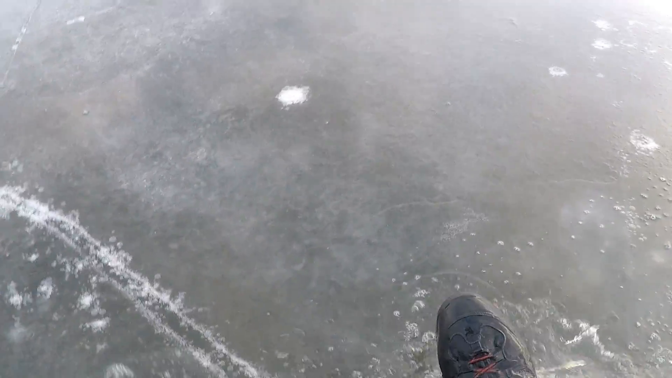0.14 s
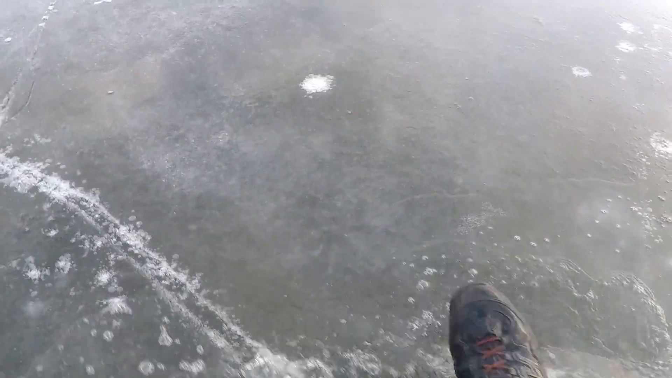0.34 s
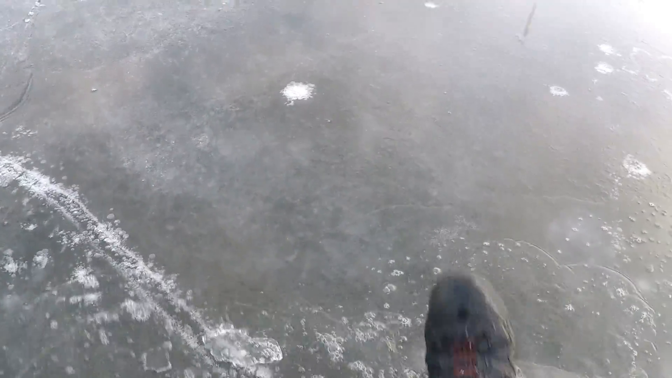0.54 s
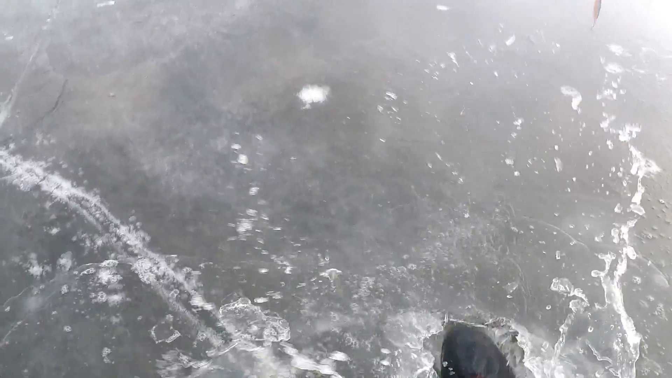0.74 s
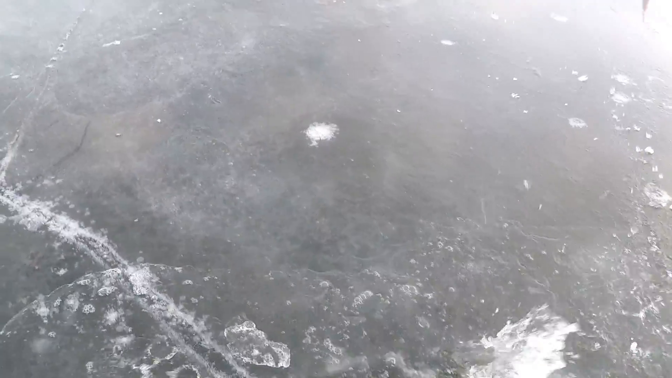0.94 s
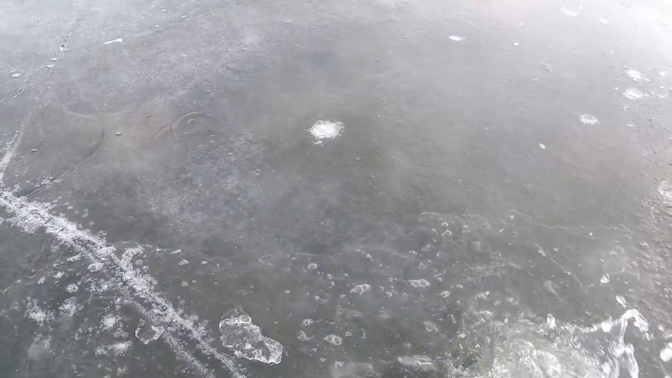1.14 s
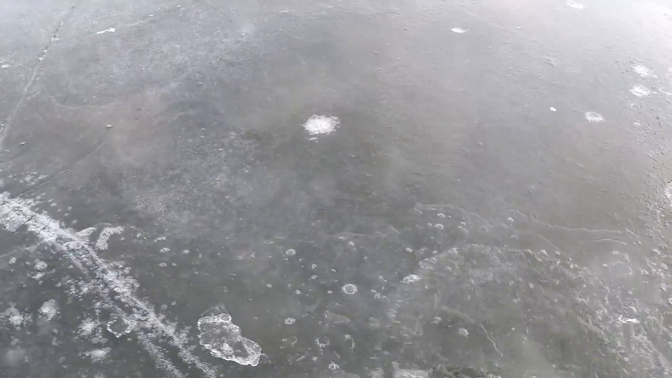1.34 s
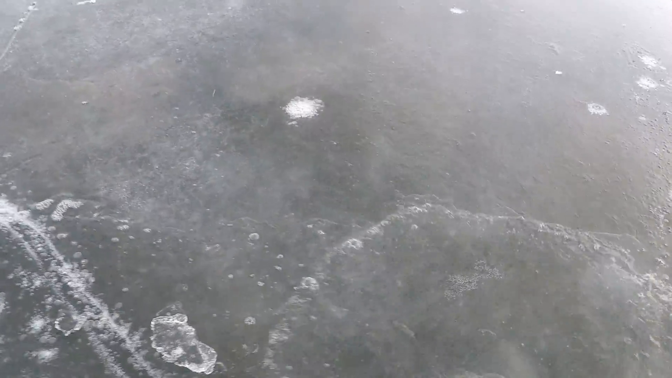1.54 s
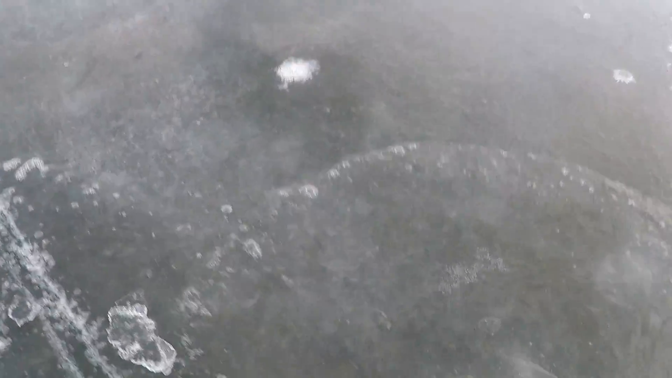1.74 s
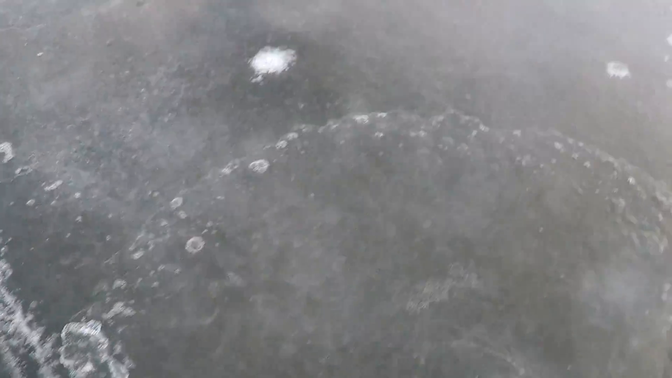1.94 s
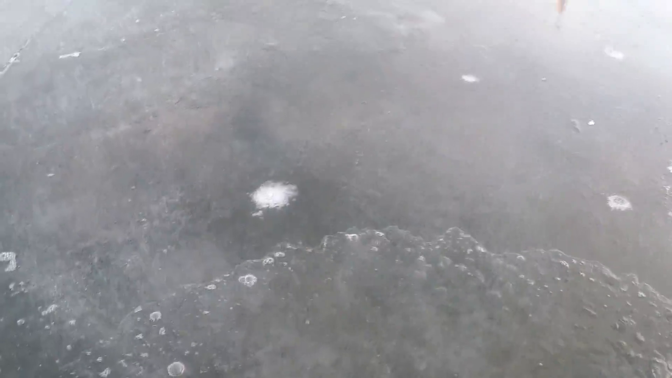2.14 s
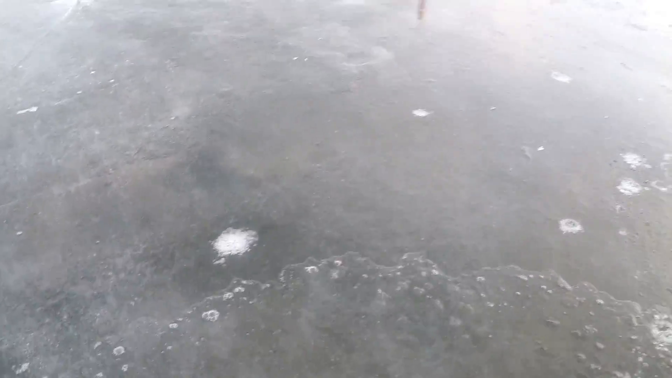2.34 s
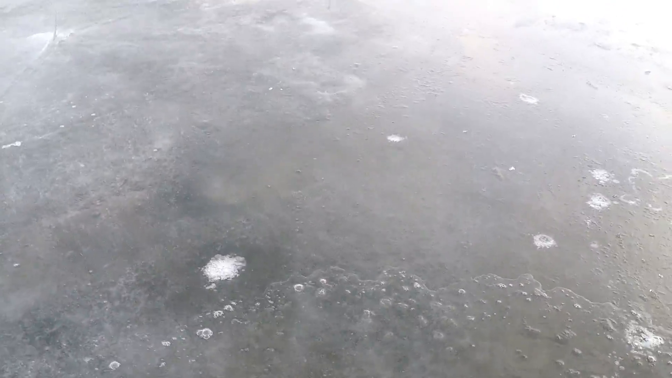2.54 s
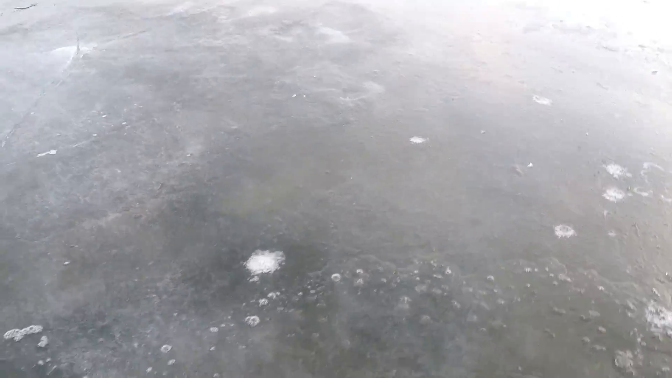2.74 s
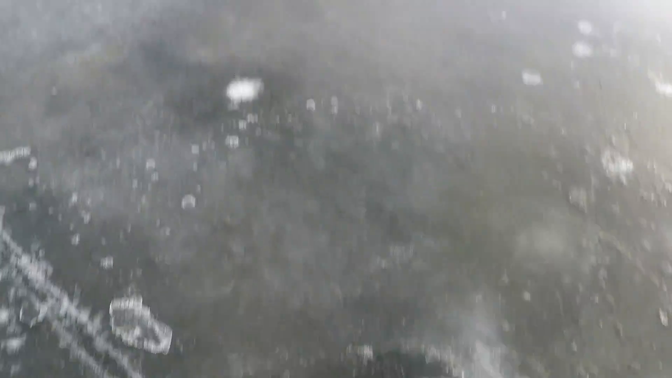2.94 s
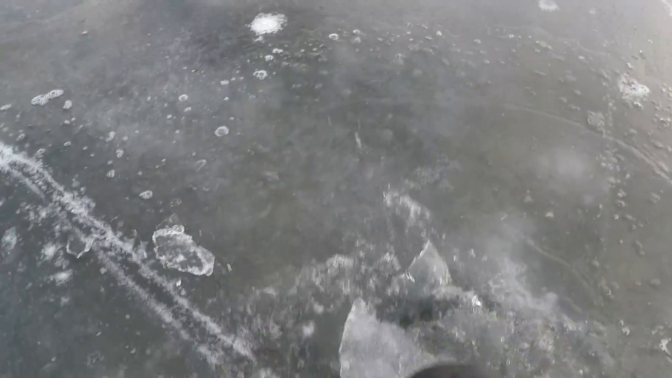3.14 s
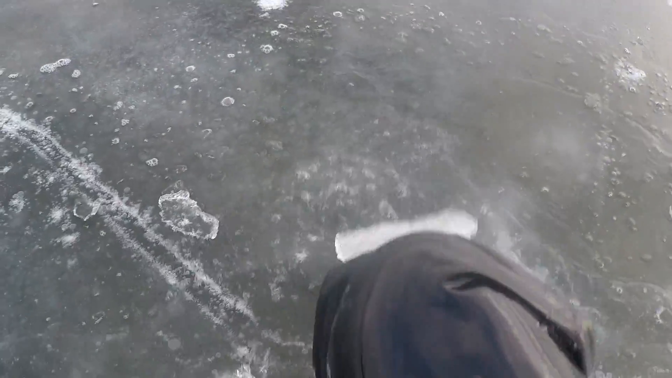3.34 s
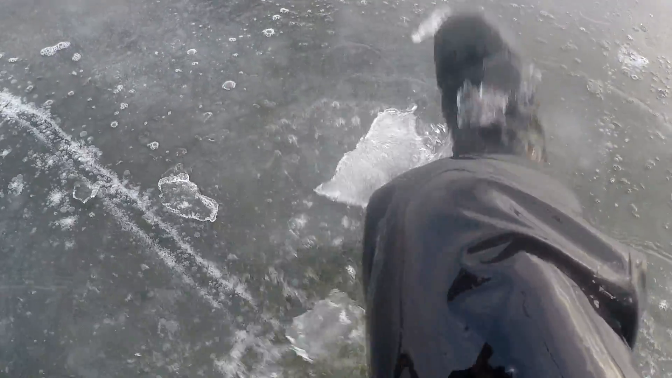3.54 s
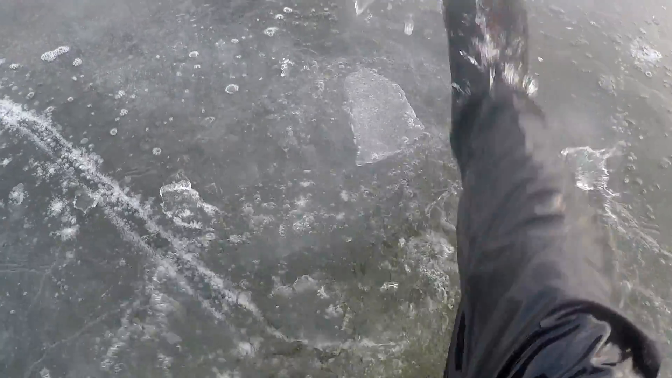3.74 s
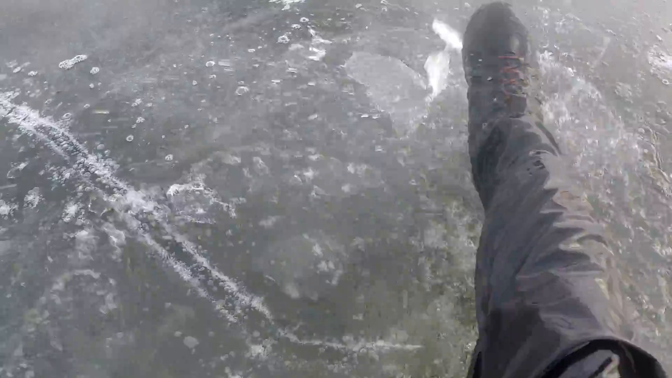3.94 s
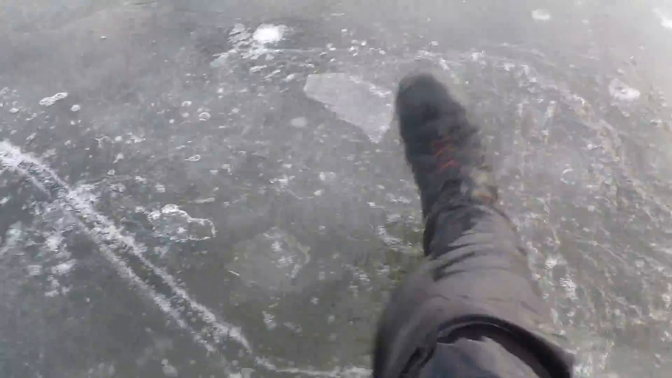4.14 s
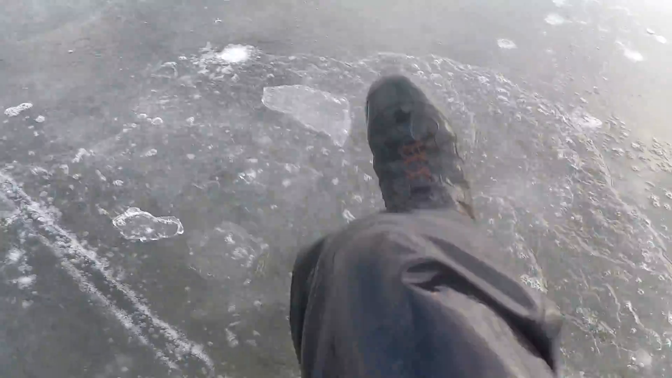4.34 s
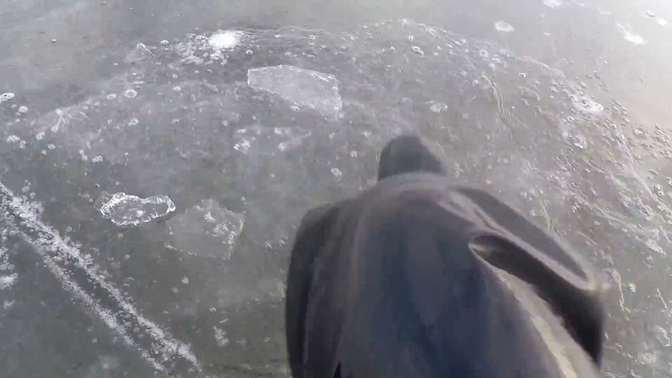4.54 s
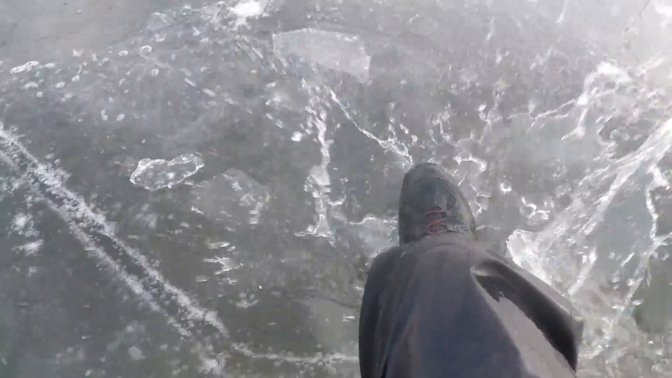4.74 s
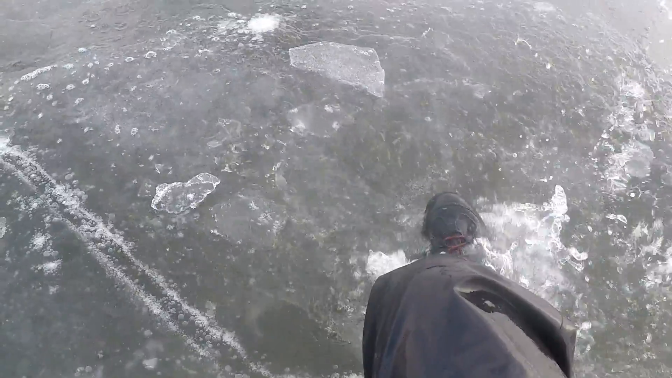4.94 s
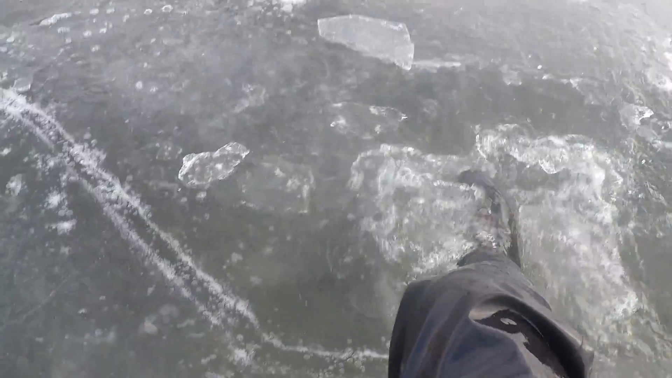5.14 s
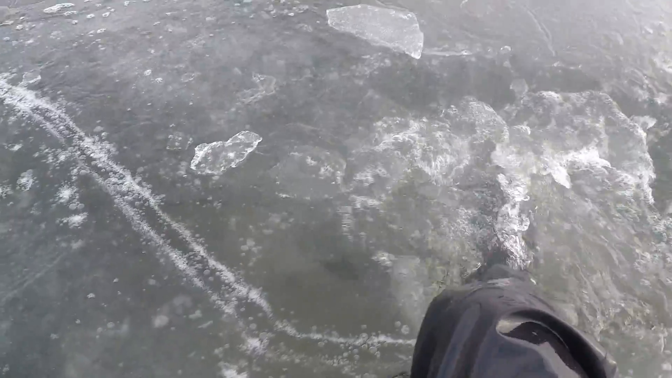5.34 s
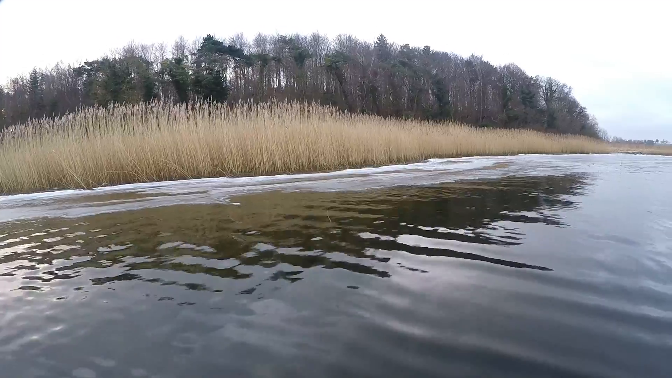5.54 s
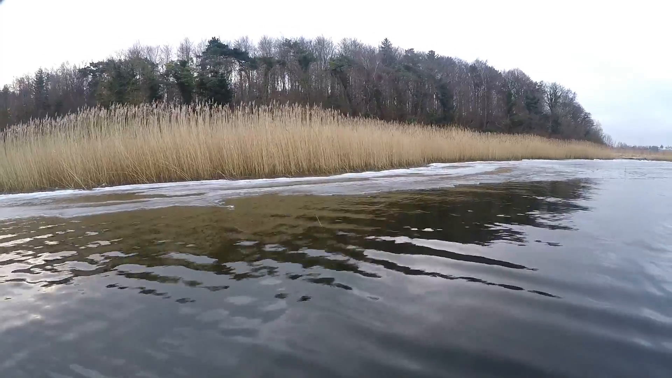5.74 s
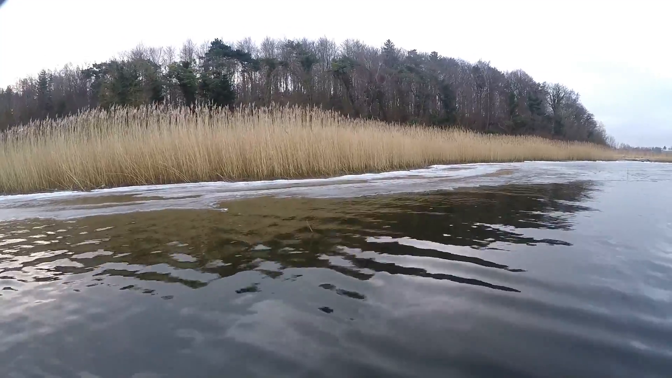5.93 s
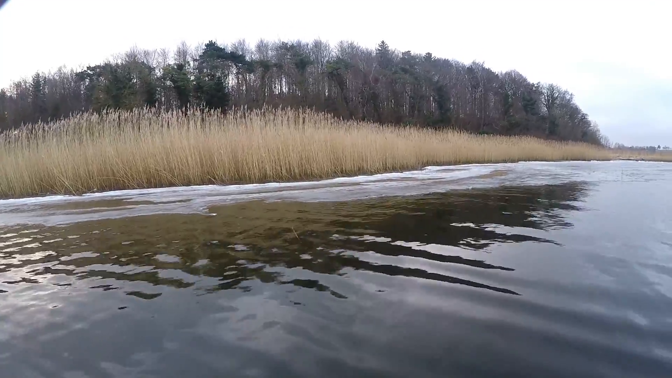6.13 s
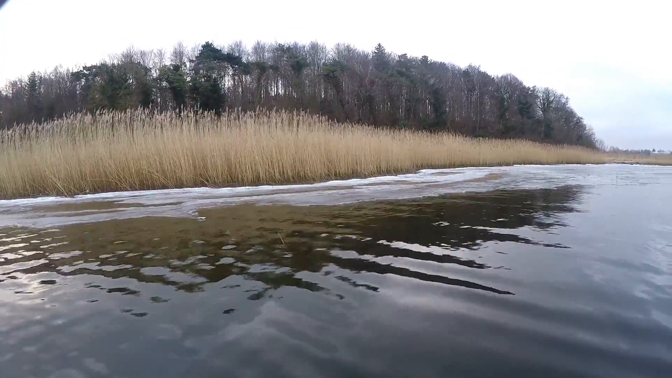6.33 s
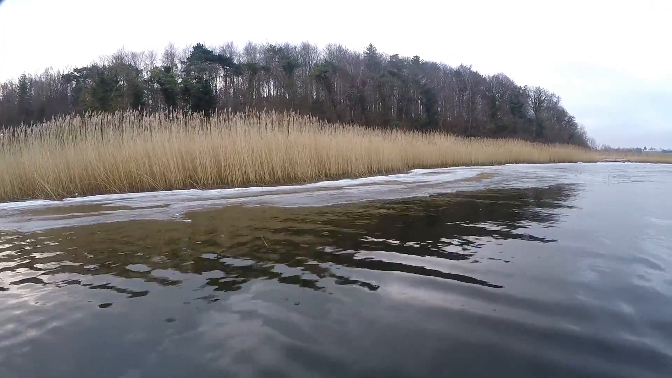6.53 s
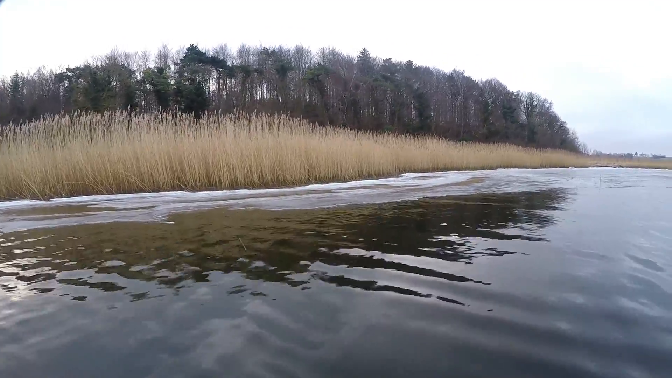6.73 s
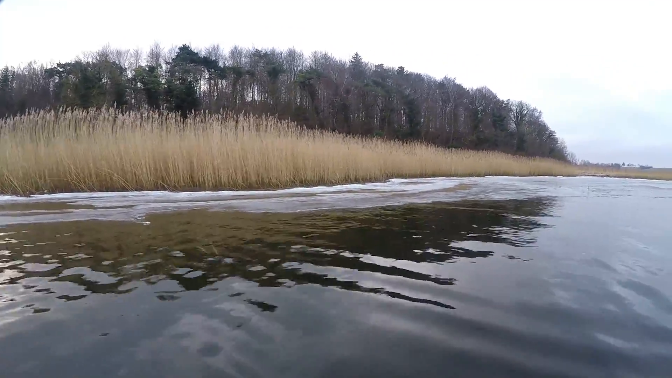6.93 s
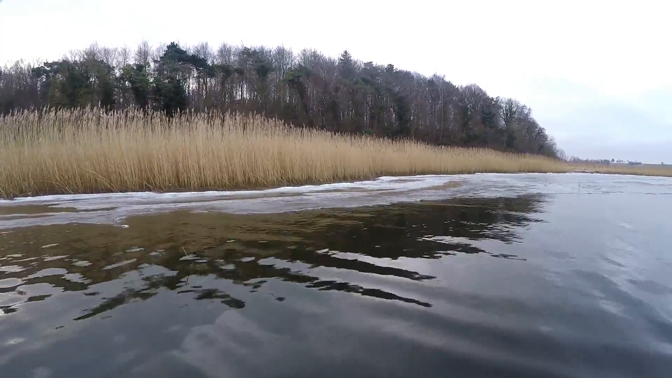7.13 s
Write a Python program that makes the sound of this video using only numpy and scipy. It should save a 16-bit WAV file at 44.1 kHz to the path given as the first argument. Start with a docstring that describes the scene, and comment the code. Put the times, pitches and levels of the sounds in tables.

```python
"""An icy shore, then open water: boots break thin ice and wade, heard at two body-worn microphone ports.
Snaps are short damped rings with crumbling noise; slush is clouds of tiny rings over filtered noise.
The sheet judders and squeaks against a pushing boot, slabs scrape, bubbles ring and wind rumbles in noise.
After a cut, in mono: a wash and trickle of small waves lap under thuds, gulps and low buffets of wind."""
import sys
import numpy as np
from scipy import signal
from scipy.fft import rfft, irfft, next_fast_len
from scipy.io import wavfile
from scipy.ndimage import uniform_filter1d

SR = 44100
rng = np.random.default_rng(int(sys.argv[2]) if len(sys.argv) > 2 else 0)


def output_pcm(signal):
    """Save a mono or channel-first signal as 16-bit PCM at the path in sys.argv[1].

    Samples are clipped to [-1, 1] before scaling.
    """
    pcm = np.clip(np.atleast_2d(signal).T, -1, 1) * 32767
    wavfile.write(sys.argv[1], SR, np.round(pcm).astype(np.int16))


N = 316638
PADDED = next_fast_len(N, True)
T = np.arange(N) / SR  # s
HZ = np.fft.rfftfreq(PADDED, 1 / SR)

CUT_S, EDGE_HZ = 5.546, 14900  # shore gives way to open water; upper band limit
STUCK_START_S, STUCK_END_S = 3.345, 3.66  # the boot presses against the sheet
CALM_DB, CALM_GRIT = (-53.5, -60.5, -54), 0.46  # between strokes: slosh, crunch, spray; share of crumbs
SWELL_S, SWELL_WIDTH_S, SWELL_DB = 6.36, 0.44, 8.5  # one slow swell: crest, half width, height
FADE_IN_S = 0.51  # open-water lapping after the cut

# Spectrum of slush. Each row: frequency in Hz, relative density in dB per Hz.
SLUSH_SPECTRUM = [(150, -4), (250, -1), (384, -5), (531, -5.5), (904, -7.5), (1320, -2.5), (1650, 0.5),
                  (2200, -5.5), (3210, -8.5), (4760, -16.5), (6050, -11), (7300, -16.5), (8240, -20),
                  (12600, -37), (15000, -37)]
# Spectrum of small waves. Each row: frequency in Hz, relative density in dB per Hz.
RIPPLE_SPECTRUM = [(240, -2), (310, 0), (487, -1), (816, -12), (1500, -9.5), (2150, -14), (2800, -24),
                   (3890, -24.5), (5350, -16), (7350, -20), (9090, -13.5), (15000, -31)]
# Spectrum of wind rumble. Each row: frequency in Hz, relative density in dB per Hz.
RUMBLE_SPECTRUM = [(8, -2), (25, 1), (55, -6.5), (110, -15), (200, -25.5), (500, -57), (4000, -115)]
# Spectrum of dull churning. Each row: frequency in Hz, relative density in dB per Hz.
DULL_SPECTRUM = [(50, -35.5), (95, -37), (145, 0.5), (240, -3), (350, -15), (600, -25.5), (1500, -57),
                 (8000, -86)]
# Level tilt of the ports. Each row: frequency in Hz, left over right in dB.
PORT_TILT = [(60, -2.5), (200, -3.5), (450, 0.5), (850, 1), (1150, -7.5), (1850, -2), (2600, -5.5),
             (4100, 0), (6600, 7), (9000, 0.5)]
# Phase between the ports. Each row: frequency in Hz, lead of the left in radians.
PORT_LEAD = [(30, 0), (200, -.25), (600, -.6), (950, -1.2), (1550, .3), (2300, -1), (4200, -.5),
             (6300, -1.4), (8000, -3), (11000, -6.3)]
# Likeness of noise at the ports. Each row: frequency in Hz, correlation from -1 to 1.
PORT_LIKENESS = [(60, 0.94), (170, 0.71), (350, 0.35), (520, 0.09), (1200, 0.11), (1700, 0.56),
                 (4200, 0.28), (6000, 0.33), (14000, 0.04)]
# Pushes of a boot or leg. Each row: peak in seconds, crunch level in dB, rise in seconds, t60 in seconds,
# slosh over crunch in dB, spray over crunch in dB, share of crumbs 0-1, left over right in dB.
STROKES = [(.07, -34.5, 0.2, 1.17, -5.5, 1, 0.53, 0.5), (.54, -49, 0.44, 0.37, 1, 11, 0.2, 0),
           (0.663, -28.5, 0.048, 1.06, 0.5, -4.5, 0.22, 0.5), (.76, -38.5, 0.091, 1.1, -4, 10.5, 0.56, 0),
           (.835, -31, 0.049, 0.46, -9, -7, 0.26, -3), (.985, -33.5, 0.54, 0.8, -4.5, 0.5, 0.21, 0),
           (1.32, -39.5, 0.37, 0.9, -9.5, 3.5, 0.54, 0.5), (1.599, -40, 0.54, 0.5, -5, -1, 0.72, -1),
           (1.76, -48, 0.72, 3.6, -2, 2, 0.55, -0.5), (2.68, -52, 0.081, 1.7, 5, 9, 0.38, -1.5),
           (3.04, -36, 0.32, 0.28, -6.5, -5, 0.5, 0), (3.1, -32.5, 0.22, 0.55, -9, -4, 0.22, 3),
           (3.28, -38.5, 0.33, 3.7, 1.5, -2, 0.45, -0.5), (3.635, -33, 0.41, 0.26, 1.5, -8.5, 0.29, 2.5),
           (3.81, -41.5, 0.98, 0.55, -26, 6.5, 0.77, -0.5),
           (3.876, -21, 0.014, 0.098, -2.5, -17.5, 0.53, 1), (3.968, -29, 0.064, 0.8, -14, -4.5, 0.26, 0.5),
           (4.086, -37.5, 0.072, 0.2, -16, 6, 0.4, 4), (4.69, -28, 0.024, 0.83, 0.5, 0.5, 0.3, 0.5),
           (4.81, -27.5, 0.13, 0.67, -5, -10, 0.34, 1), (5.16, -39, 0.89, 2, -3.5, 5.5, 0.35, -0.5),
           (5.47, -43.5, 0.45, 0.57, -1.5, -3.5, 0.74, -2)]
# Ice snaps and ticks. Each row: start in seconds, relative level in dB, ring in Hz, left over right in dB,
# crumbling over the snap in dB before trims, t60 of the early crumbling in seconds.
CRACKS = [(0.056, -9, 3060, -1, -15, .024), (0.135, -2, 6160, 18, -37, 0.022),
          (0.158, -18.5, 1900, 0, -8, 0.031), (0.224, -7.5, 5740, 5, -15.5, 0.016),
          (0.664, -8, 1800, -1.5, 1, 0.0068), (0.708, -13.5, 1340, -3, -7, 0.067),
          (0.756, -9, 4200, 7, -23.5, 0.032), (0.826, -16.5, 1890, -0.5, -12.5, 0.041),
          (0.862, -17, 3160, -3, -10.5, 0.027), (0.93, -23, 1556, -1, 2, 0.013),
          (0.945, -5, 3000, -2, -14.5, 0.043), (0.988, -4.5, 5340, 8, -21, 0.014),
          (1.266, -6.5, 4200, -4.5, -11, 0.017), (1.333, -12, 3330, -9.5, -10.5, 0.029),
          (1.384, -17, 1620, -8, -13, 0.034), (1.429, -21, 1830, -7, -6, 0.022),
          (1.5, -20, 3250, 2, -18, 0.049), (1.72, -21.5, 3130, -6, -6, .015),
          (1.746, -10, 3250, 0, -11, 0.025), (1.755, -17, 1500, -17, -12.5, 0.017),
          (2.603, -30.5, 2060, -2, -1, 0.025), (2.933, -10, 3200, -4, -19, 0.02),
          (2.996, -12, 1740, 6, -28, .024), (3.025, -25, 4200, 11, -17, .04),
          (3.049, -10, 3130, 3, -11, 0.03), (3.085, -2.5, 5960, 13, -24, 0.031),
          (3.094, -20, 2970, -4, -5.5, 0.079), (3.35, -14, 1980, 23, -10.5, 0.026),
          (3.402, -12, 3670, 0, -19, 0.022), (3.5785, -17.5, 1370, 1.5, -11.5, 0.012),
          (3.643, -9, 1910, 12.5, -17, 0.012), (3.653, -2.5, 3120, -5, -16, .024),
          (3.655, -7, 1810, 12, -13, 0.014), (3.707, -12.5, 5670, 5.5, -14.5, 0.022),
          (3.862, -8, 3420, 4, -5.5, 0.019), (3.8695, -10, 3960, -1.5, -21.5, 0.013),
          (3.8759, 0, 1540, 4, -25, 0.04), (3.971, -2, 3980, 3, -17.5, 0.03),
          (4.011, -11, 1370, 6, -14, 0.02), (4.077, -1, 5940, 3.5, -24, .014),
          (4.091, -10, 4280, -4, -12.5, 0.02), (4.153, -20, 1533, 1, -21, .02),
          (4.25, -19.5, 1600, -6, -13.5, 0.027), (4.663, -13, 3340, -1.5, -9, 0.079),
          (4.675, -12.5, 1810, 15.5, -13, 0.016), (4.683, -6, 2450, -0.5, -15, 0.068),
          (4.699, -12.5, 1500, -10, -12, 0.073), (4.824, -7, 1285, -6, -26, 0.022),
          (4.899, -13.5, 1280, -3, -12, 0.061), (5.1991, -17.5, 1820, 0, -16, 0.029),
          (6.851, -38, 1300, -4, -4, 0.021), (6.872, -31.5, 1080, 2, -6, 0.016)]
# Pressure pulses as the sheet gives way. Each row: start in seconds, level in dB.
BREAKS = [(0.6642, -5), (3.8764, -5)]
# Stick-slip jerks of the boot on the sheet. Each row: start in seconds, relative level in dB.
JERKS = [(3.3507, -11), (3.369, -9), (3.4015, -13), (3.427, -13.5), (3.439, -15), (3.456, -11),
         (3.484, -11.5), (3.508, -10.5), (3.5332, -11), (3.5551, -14), (3.579, -12.5), (3.6094, -11),
         (3.6312, -12.5)]
# Single knocks of the boot on the sheet. Each row: start in seconds, relative level in dB.
KNOCKS = [(3.861, -21), (4.151, -11), (5.196, -18.5)]
# Squeaks of wet rubber on the sheet's edge. Each row: start in seconds, level in dB, first pitch in Hz,
# last pitch in Hz, length in seconds.
SQUEAKS = [(3.348, -29.5, 650, 2860, 0.028), (3.427, -36.5, 560, 1920, 0.04),
           (3.628, -25, 1225, 2150, 0.0246)]
# Scrapes of a loose slab. Each row: start in seconds, length in seconds, level in dB.
SCRAPES = [(1.283, 0.26, -50), (2.958, 0.21, -35), (3.174, 0.075, -39)]
# Air trapped by a plunging boot. Each row: start in seconds, length in seconds, level in dB,
# first resonance in Hz, last resonance in Hz.
POCKETS = [(0.736, 0.084, -30, 605, 524), (0.811, 0.04, -35, 529, 480), (1.485, 0.06, -37, 723, 632),
           (1.667, 0.04, -42.5, 600, 710), (1.884, 0.041, -37.5, 1348, 1840),
           (4.694, 0.0373, -28, 529, 505), (4.778, 0.08, -34.5, 1350, 1114)]
# Loudest single bubbles and drips. Each row: start in seconds, relative level in dB, pitch in Hz.
BUBBLES = [(0.838, -6, 5400), (1.212, -18, 4950), (1.304, -8, 4300), (1.549, -22, 1400),
           (1.602, -18.5, 1650), (1.73, -17, 660), (1.795, -16, 1570), (1.923, -21.5, 3200),
           (2.016, -24, 1590), (2.39, -24.5, 3580), (2.475, -17, 3740), (2.566, -17.5, 5500),
           (2.865, -15.5, 4960), (3.223, -14.5, 3120), (5.849, -29.5, 1684), (5.923, -30.5, 2000),
           (6.05, -24.5, 1290), (6.189, -28, 1760), (6.245, -25, 1440), (6.353, -26.5, 1490),
           (6.366, -28, 1750), (6.686, -31, 1420)]
# Air squeezed along under the sheet. Each row: start in seconds, level in dB, first pitch in Hz,
# last pitch in Hz, length in seconds.
GURGLES = [(0.667, -20, 515, 524, 0.02), (.700, -31, 1500, 4200, 0.008), (0.786, -28, 870, 1280, 0.009),
           (1.365, -26.5, 610, 756, 0.0047), (1.593, -35, 626, 805, 0.017), (2.608, -48, 1240, 1680, 0.031),
           (2.729, -34, 536, 493, 0.023), (2.909, -30, 2080, 2950, 0.012), (2.951, -32, 4300, 4900, 0.012),
           (3.768, -30, 1880, 2160, .015), (3.805, -32, 1450, 1750, .016), (4.85, -24, 1160, 1100, 0.015)]
# Large pockets of air closed over by water. Each row: start in seconds, level in dB, pitch in Hz.
GULPS = [(1.887, -29.5, 177), (3.17, -26, 181), (3.306, -22.5, 148), (4.778, -15.5, 170),
         (5.187, -16.5, 221), (6.326, -22.5, 169), (6.342, -27.5, 282), (6.983, -26.5, 187)]
# Footfalls, gulping water and wind. Each row: start in seconds, relative level in dB, pitch in Hz.
THUDS = [(0.664, -11.5, 533), (0.667, -20, 227), (0.976, -26, 168), (1.23, -28, 164), (2.216, -29, 221),
         (3.631, -13.5, 59.7), (3.75, -13.5, 59.5), (3.862, -15.5, 184), (4.006, -18, 135.5),
         (4.154, -14.5, 74.4), (4.385, -19.5, 161), (4.683, -19, 263), (4.797, -15.5, 294),
         (5.039, -15.5, 109), (5.201, -12.5, 62.4), (5.346, -24.5, 154), (5.791, -19, 77),
         (6.188, -13.5, 70), (6.438, -19, 113), (6.514, -13, 61.6), (7.067, -18, 62), (7.117, -14.5, 61.7)]
# Wavelets folding over. Each row: start in seconds, gain added to the steady trickle's gain of 1 in dB.
WAVELETS = [(5.995, 3), (6.051, 3), (6.453, 5), (6.645, 3), (7.15, 12)]
# Wind on the microphone. Each row: time in seconds, rumble level in dB.
WIND = [(0.0, -55), (0.46, -65), (0.94, -36.5), (1.62, -47), (3.18, -29.5), (3.64, -20), (3.68, -46),
        (3.76, -25), (4.32, -30), (4.38, -19), (4.46, -29.5), (5.18, -30.5), (5.2, -29), (5.42, -37.5),
        (6.5, -24.5), (6.8, -31.5), (7.1, -22.5), (7.18, -33)]


def amp(db):
    """Decibels to gain."""
    return np.exp(np.asarray(db) * (np.log(10) / 20))


def read(points):
    """Interpolates a spectrum table over log frequency."""
    hz, value = np.transpose(points)
    return np.interp(np.log(HZ + 1), np.log(hz + 1), value)


def shaped(x, gain):
    """Filters by a gain on the frequency grid."""
    return irfft(rfft(x, PADDED) * gain, PADDED)[..., :N]


def band(lo_hz, hi_hz, order=8):
    """Gain of a band-pass; neighbouring bands share their power."""
    return ((1 + (lo_hz / (HZ + 1)) ** order) * (1 + (HZ / hi_hz) ** order)) ** -.5


def band_passed(x, lo_hz, hi_hz, order=2):
    """Butterworth band-pass for short sounds."""
    return signal.lfilter(*signal.butter(order, [lo_hz, hi_hz], "band", fs=SR), x)


def evened(x):
    """Scales to rms 1 in the middle of the channels."""
    return x / np.sqrt(np.mean(np.atleast_2d(x).mean(0) ** 2) + 1e-20)


def wander(hz):
    """Random modulator of rms 1, up to the given rate."""
    return evened(shaped(rng.standard_normal(N), band(hz / 8, hz)))


def add(mix, start_s, sound):
    """Lays a sound into the mix."""
    part = mix[:, max(round(start_s * SR), 0):][:, :sound.shape[-1]]
    part += sound[..., :part.shape[1]]


def noise_pair():
    """White noise, partly alike at the two ports."""
    left, other = rfft(rng.standard_normal((2, PADDED)))
    same = np.clip(read(PORT_LIKENESS), -1, 1)
    right = same * left + np.sqrt(1 - same ** 2) * other
    return irfft([left, right], PADDED)[:, :N]


def ports(x):
    """Each band differs in level and phase between the ports."""
    half = amp(read(PORT_TILT) / 2) * np.exp(.5j * read(PORT_LEAD))
    return shaped(x, np.array([half, 1 / half]))


def ring(t, hz, cycles, rise, phase=0):
    """A damped ring that lasts some cycles and glides in pitch, as a surfacing bubble does."""
    age = t * hz / cycles
    turns = hz * t * (1 + rise * np.minimum(age, 5))
    return (1 - np.exp(-2 * t * hz)) * np.exp(-age) * np.sin(2 * np.pi * turns + phase)


def scatter(per_s, spread_db):
    """Random events, a few much larger than the rest: start in s, gain on each side, kind 0-1."""
    most = 1000
    for when, keep, kind, size, side in rng.random((most, 5)):
        if keep < per_s * N / SR / most:
            size_db = spread_db * min(-np.log(1 - size), 3)
            yield when * N / SR, amp(size_db) * np.sqrt([[side], [1 - side]]), kind


def pressing(ease_s):
    """1 while the boot presses the sheet; builds up beforehand and lets go within 9 ms."""
    onset = np.clip((T - STUCK_START_S) / ease_s + 1, 0, 1)
    return onset * np.clip((STUCK_END_S - T) / 0.0087, 0, 1)


def churning(rise_db=20):
    """Strokes swell and die away; gives slosh, crunch and spray gains per side, and the share of crumbs."""
    power = amp(CALM_DB)[:, None, None] ** 2 * np.ones((2, N))
    total = power[:, 0].sum(0)
    gritty = CALM_GRIT * total
    for peak_s, db, rise_s, t60_s, slosh_db, spray_db, grit, pan_db in STROKES:
        drop_db = np.maximum(rise_db * (peak_s - T) / rise_s, 60 * (T - peak_s) / t60_s)
        stroke = amp(db - np.minimum(drop_db, 100)) ** 2
        sizes = amp([slosh_db, 0, spray_db]) ** 2
        power += np.outer(sizes, amp([pan_db, -pan_db]))[..., None] * stroke
        total += sizes.sum() * stroke
        gritty += grit * sizes.sum() * stroke
    return np.sqrt(power), np.clip(gritty / total, 0, 1)


def surges(drag_s=0.015, held_db=-11, surge_s=.005):
    """While the boot sticks against the sheet, the water is held back and moves only with each jerk."""
    stuck = pressing(drag_s)
    starts = np.sort([start_s for start_s, db in JERKS])
    since_s = abs(T - starts[np.maximum(np.searchsorted(starts, T) - 1, 0)])
    pulse = since_s / surge_s * np.exp(-since_s / surge_s)
    return 1 - stuck + stuck * (amp(held_db) + pulse)


def grains(per_s, spread_db, cycles, rise, count=60):
    """A whitened cloud of tiny rings, each size with its own phase between sides; a few are much larger."""
    t, out = np.arange(2048) / SR, np.zeros((2, N))
    most = 800
    for hz in np.geomspace(280, 13000, count):
        detune, length, side = rng.uniform(-0.71, 1, 3)
        grain_cycles = cycles * np.sqrt(hz / 2000) * 2.26 ** length
        grain = ring(t, hz * (1 + 0.012 * detune), grain_cycles, rise, side * np.array([[.9], [-.9]]))
        grain *= np.sqrt(hz ** 0.34 / np.sum(grain[0] ** 2))
        when, keep = rng.random((2, most))
        size_db = spread_db * np.minimum(rng.exponential(1, most), 3)
        sizes = rng.choice([-1, 1], most) * amp(size_db)
        heard = keep < per_s / count * (hz / 2000) ** .3 * N / SR / most
        for start_s, size in zip((when[heard] * N / SR).tolist(), sizes[heard]):
            add(out, start_s, size * grain)
    return evened(out)


def patchy(x, patch_db, order=3):
    """Swarms of bubbles light up small patches of the spectrum for a few milliseconds each."""
    z = signal.stft(x, nperseg=256)[2]
    swarms = uniform_filter1d(rng.standard_normal(z.shape[-2:]), order, 0)
    swarms = uniform_filter1d(swarms, order, 1)
    return signal.istft(z * amp(patch_db * swarms / swarms.std()))[1][..., :N]


def slush(slosh, crunch, spray, grit, droplet_db=-1, flutter_db=1.0, clump_db=2.5, patch_db=2.5):
    """Crumbs and droplets ring over a noise wash; three bands clump separately and follow the strokes."""
    crumbs = grains(per_s=1800, spread_db=3.5, cycles=1.42, rise=0)
    droplets = grains(per_s=900, spread_db=3.0, cycles=12.6, rise=0.014)
    rings = evened(crumbs + amp(droplet_db) * droplets)
    cloud = np.sqrt(grit) * rings + np.sqrt(1 - grit) * evened(noise_pair())
    stirred = np.minimum(crunch / amp(-39.5), 1)  # calm water hisses evenly
    cloud = cloud + stirred * (patchy(cloud, patch_db) - cloud)
    fluttering = cloud * amp(grit * flutter_db * wander(hz=92.5))
    cloud = ports(shaped(fluttering, amp(read(SLUSH_SPECTRUM))))
    out = np.zeros((2, N))
    for level, gain in [(slosh, band(230, 883)), (crunch, band(1130, 4870)), (spray, band(3710, 12600))]:
        clumps = amp(grit * clump_db * wander(hz=56.3))
        out += level * evened(shaped(cloud, gain) * clumps)
    return out


def cracks(snap_db=-3.0, snap_cycles=3.6, tail_db=-19, tail_t60_s=0.21, strain_db=-11, strain_s=0.006,
           stutter_db=3):
    """The ice crackles under strain, snaps and rings for a few cycles; smaller breaks stutter on behind."""
    early_s = .02
    t = np.arange(SR // 5) / SR - early_s
    after = np.maximum(t, 0)
    snaps, crumbs = np.zeros((2, N)), np.zeros((2, N))
    for start_s, db, hz, pan_db, crumbling_db, t60_s in CRACKS:
        shared, left, right = rng.standard_normal((3, len(t)))
        noise = shared + 0.92 * np.array([left, right])
        breaks = band_passed(noise, hz * 0.31, min(hz * 2.45, SR / 2.2), order=1)
        strain = amp(strain_db) * np.exp(-abs(t) / strain_s)
        decay = amp(-60 * after / t60_s) + amp(tail_db - 60 * after / tail_t60_s)
        fade = np.where(t < 0, strain, decay)
        sides = amp(pan_db * np.array([[.5], [-.5]]))
        gain = amp(db) * sides / sides.mean()
        add(snaps, start_s - early_s, gain * ring(after, hz, snap_cycles, 0.0071))
        add(crumbs, start_s - early_s, gain * amp(crumbling_db) * evened(breaks) * fade)
    lead = np.exp(.5j * read(PORT_LEAD) * np.array([[1], [-1]]))
    stutter = amp(stutter_db * wander(hz=404))
    return shaped(amp(snap_db) * snaps + stutter * crumbs, band(200, 6570) * lead)


def fracture(width_s=0.000064):
    """A sudden drop in pressure as the sheet breaks through."""
    age, out = np.arange(SR // 100) / SR / width_s, np.zeros((2, N))
    for start_s, db in BREAKS:
        add(out, start_s, amp(db) * (age - 1) * np.exp(-age))
    return shaped(out, band(100, 6450, order=4))


def judder(knock_db=-1, knock_hz=620, knock_s=0.0042, thump_db=3, thump_hz=162, thump_cycles=0.97,
           lag_s=0.0011, grate_db=-14, grate_t60_s=0.012):
    """Each jerk knocks and grates on the sheet's edge; the slower bending wave follows as a low thump."""
    t, out = np.arange(SR // 12) / SR, np.zeros((2, N))
    contact = np.sin(np.pi * np.minimum(t / knock_s, 1)) ** 2
    for start_s, db in JERKS + KNOCKS:
        size = rng.uniform(0.795, 1.1)  # scales both pitches
        grate = evened(band_passed(rng.standard_normal(len(t)), 1100, 2100))
        knock = contact / 2 * np.sin(2 * np.pi * knock_hz * size * t)
        thump = ring(t, thump_hz * size, thump_cycles, -0.104)
        add(out, start_s, amp(db + grate_db - 60 * t / grate_t60_s) * grate)
        add(out, start_s - lag_s, amp(db + knock_db) * knock)
        add(out, start_s + lag_s, amp(db + thump_db) * thump)
    return ports(out)


def squeaks(overtone_db=-5, rough=0.29):
    """The slipping speeds up, so each squeak and its overtone sweep upward, unevenly loud."""
    out = np.zeros((2, N))
    for start_s, db, first_hz, last_hz, length_s in SQUEAKS:
        hz = np.linspace(first_hz, last_hz, round(length_s * SR))
        phase = 2 * np.pi * np.cumsum(hz) / SR
        tone = np.sin(phase) + amp(overtone_db) * np.sin(2 * phase)
        add(out, start_s, amp(db) * signal.windows.tukey(len(phase), .5) * tone)
    return ports(shaped(out * (1 + rough * wander(hz=202)), band(400, 2100)))


def scrapes(slab_hz=3200, width_hz=550, chatter_db=4):
    """Chattering friction rings the slab in one broad resonance."""
    pressure = np.zeros((1, N))
    for start_s, length_s, db in SCRAPES:
        add(pressure, start_s, amp(db) * signal.windows.tukey(round(length_s * SR), .5))
    rub = noise_pair() * amp(chatter_db * wander(hz=120))
    resonance = 1 / (1 + (2 * (HZ - slab_hz) / width_hz) ** 2)
    return pressure * evened(ports(shaped(rub, resonance)))


def chirps(per_s, spread_db, low_hz, high_hz, life_s, rise):
    """Stirred-in air surfaces as bubbles that rise in pitch."""
    t, out = np.arange(SR // 20) / SR, np.zeros((2, N))
    for start_s, gain, kind in scatter(per_s, spread_db):
        hz = low_hz * (high_hz / low_hz) ** kind
        add(out, start_s, gain * ring(t, hz, life_s * np.sqrt(2000 * hz), rise))
    return evened(ports(shaped(out, band(low_hz, high_hz * (1 + 10 * rise)))))


def splinters(per_s=55, spread_db=3, life_s=0.0009, low_hz=1100):
    """Loose shards tick against each other in short noise bursts."""
    t, out = np.arange(SR // 100) / SR, np.zeros((2, N))
    ticks = rng.standard_normal((64, len(t))) * np.exp(-t / life_s)
    for start_s, gain, kind in scatter(per_s, spread_db):
        add(out, start_s, gain * ticks[int(kind * len(ticks))])
    return evened(ports(shaped(out, amp(read(SLUSH_SPECTRUM)) * band(low_hz, 16000, order=2))))


def debris(slosh, crunch, spray, plop_db=-7, chirp_db=-9, splinter_db=-15):
    """Big bubbles plop in the slosh, small ones chirp in the crunch, and shards tick in the spray."""
    plops = chirps(per_s=58, spread_db=3.5, low_hz=391, high_hz=900, life_s=0.0018, rise=0.031)
    small = chirps(per_s=130, spread_db=3.5, low_hz=1065, high_hz=4200, life_s=0.0035, rise=.045)
    bubbling = amp(plop_db) * slosh * plops + amp(chirp_db) * crunch * small
    return bubbling + amp(splinter_db) * spray * splinters()


def pockets(width=0.23):
    """Turbulence shakes each trapped pocket of air, whose resonance slides as it changes size."""
    out = np.zeros((2, N))
    for start_s, length_s, db, first_hz, last_hz in POCKETS:
        hz = np.geomspace(first_hz, last_hz, round(length_s * SR))
        real, imag = rng.standard_normal((2, SR // 4))
        low_pass = signal.butter(2, width * first_hz / 2, fs=SR)
        shake = signal.lfilter(*low_pass, real + 1j * imag)[-len(hz):]
        hollow = evened((shake * np.exp(2j * np.pi * np.cumsum(hz) / SR)).real)
        add(out, start_s, amp(db) * signal.windows.tukey(len(hz), .5) * hollow)
    return ports(out)


def bubbles(bubble_db=-5.0, swell_s=0.00062, life_s=0.0032, rise=0.005, splat_db=-12, splat_s=0.00094):
    """Bubbles close with a tiny splat, swell and ring; gurgles glide as their air pocket changes size."""
    t, out = np.arange(SR // 20) / SR, np.zeros((2, N))
    for start_s, db, hz in BUBBLES:
        splat = amp(splat_db) * rng.standard_normal((2, len(t))) * np.exp(-t / splat_s)
        tone = ring(t, hz, life_s * np.sqrt(2000 * hz), rise) * (1 - np.exp(-t / swell_s))
        add(out, start_s, amp(db + bubble_db) * (tone + splat))
    for start_s, db, first_hz, last_hz, length_s in GURGLES:
        hz = np.geomspace(first_hz, last_hz, round(length_s * SR))
        tone = np.sin(2 * np.pi * np.cumsum(hz) / SR)
        add(out, start_s, amp(db) * signal.windows.tukey(len(hz), .7) * tone)
    return ports(shaped(out, band(430, 8500, order=14)))


def gulps(cycles=4.7):
    """Each large pocket of air swells into a low throb and dies away."""
    out = np.zeros((2, N))
    for start_s, db, hz in GULPS:
        t = np.arange(0, cycles / hz, 1 / SR)
        add(out, start_s, amp(db) * signal.windows.tukey(len(t), .5) * np.sin(2 * np.pi * hz * t))
    return ports(out)


def thuds(thud_db=3, thud_s=0.0039, puff_db=-14, puff_hz=420, puff_t60_s=0.05):
    """A heavily damped low push with a dull puff of turbulence."""
    t, out = np.arange(SR // 4) / SR, np.zeros((2, N))
    for start_s, db, hz in THUDS:
        puff = evened(band_passed(rng.standard_normal((2, len(t))), 90, puff_hz))
        puff = puff * amp(puff_db - 60 * t / puff_t60_s) * (1 - np.exp(-t / 0.0091))
        push = ring(t, hz, hz * thud_s, 0.008)
        add(out, start_s, amp(db + thud_db) * (0.75 * push / abs(push).max() + puff))
    return ports(shaped(out, band(15, 1800, order=4)))


def folding(fold_s=0.004):
    """Gain of the trickle: every wavelet lifts it quickly and lets it sink back."""
    gain = np.ones(N)
    for start_s, db in WAVELETS:
        age = np.maximum(T - start_s, 0) / fold_s
        gain += amp(db) * age * np.exp(1 - age)
    return gain


def lapping(lap_db=-57, fizz_db=-66.0, clump_db=1.6, lap_fade_db=8, fizz_fade_db=32):
    """Tiny bubbles trickle out of a smooth wash as the swell passes and wavelets fold; the crest slops."""
    swell_db = SWELL_DB * np.exp(-((T - SWELL_S) / SWELL_WIDTH_S) ** 2)
    rings = grains(per_s=1500, spread_db=4.5, cycles=4.5, rise=.008)[0]
    trickle = shaped(rings, band(200, 6800))
    trickle = evened(trickle * amp(clump_db * wander(hz=43.6))) * folding()
    cloud = amp(swell_db - 7) * trickle + rng.standard_normal(N)
    cloud = shaped(cloud, amp(read(RIPPLE_SPECTRUM)))
    faded = np.clip(1 - (T - CUT_S) / FADE_IN_S, 0, 1)  # the treble fades in from deeper
    lap = amp(lap_db + swell_db / 2 - lap_fade_db * faded)
    fizz = amp(fizz_db - fizz_fade_db * faded)
    slop = amp(swell_db - SWELL_DB) * evened(shaped(cloud, band(230, 300)))
    wash = evened(shaped(cloud, band(580, 4200)))
    return lap * (slop + wash) + fizz * evened(shaped(cloud, band(3400, 13500)))


def lows(slosh, surge, gust_db=2.5, lump_db=3, calm_db=-49, slosh_db=-8, wind_db=-17, press_db=-22,
         press_s=0.041):
    """Lumpy wind rumble under a dull churning that follows slosh and wind; the pressing boot lifts both."""
    rumble = amp(np.interp(T, *np.transpose(WIND)))
    press = amp(press_db) * pressing(press_s)
    moving = (amp(slosh_db) * slosh) ** 2 + (amp(wind_db) * rumble) ** 2
    dull = np.sqrt(amp(calm_db) ** 2 + moving + press ** 2)
    wind = shaped(noise_pair(), amp(read(RUMBLE_SPECTRUM)))
    wind = evened(wind * amp(gust_db * wander(hz=24.8)))
    churn = shaped(noise_pair(), amp(read(DULL_SPECTRUM)))
    churn = evened(churn * amp(lump_db * wander(hz=23.8)))
    return surge * (np.hypot(rumble, press) * wind + dull * ports(churn))


def scene():
    """The icy shore in stereo, a short silence at the cut, then open water in mono."""
    shore = np.clip((CUT_S - T) / .002, 0, 1)
    open_water = np.clip((T - CUT_S - .025) / .1, 0, 1)
    (slosh, crunch, spray), grit = churning()
    surge = surges()
    ice = slush(slosh * surge, crunch, spray, grit) + fracture() + judder() + squeaks() + scrapes()
    ice = ice + debris(slosh, crunch, spray) + pockets()
    both = cracks() + bubbles() + gulps() + thuds() + lows(slosh.mean(0), surge)
    return shore * (ice + both) + open_water * (both.mean(0) + lapping())


def record(dry):
    """Limits the band at EDGE_HZ with a linear-phase low-pass."""
    low_pass = signal.firwin(511, EDGE_HZ, window=("kaiser", 9), fs=SR)
    return signal.oaconvolve(dry, low_pass[None], "same")


dry = scene()
out = record(dry)
output_pcm(out)
```